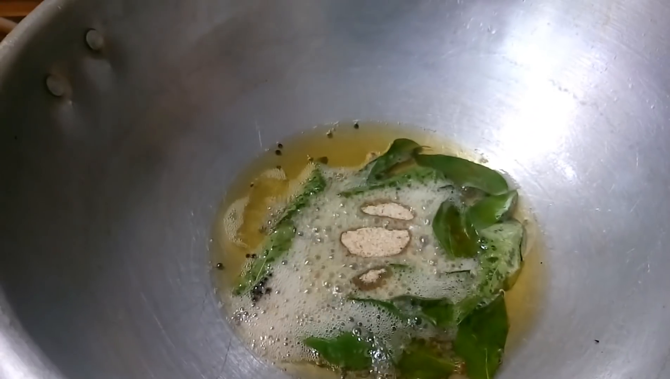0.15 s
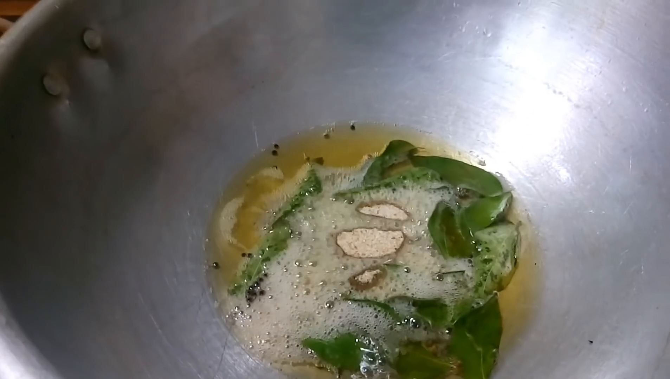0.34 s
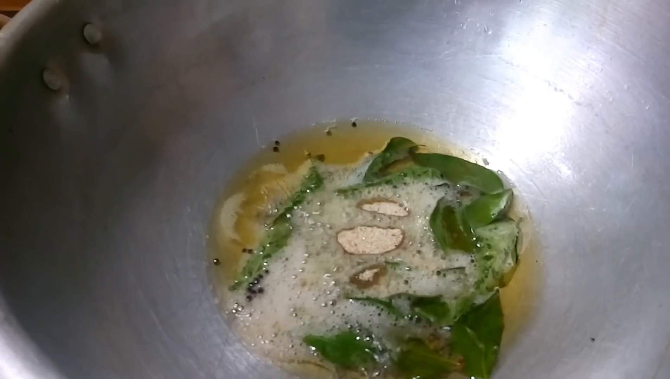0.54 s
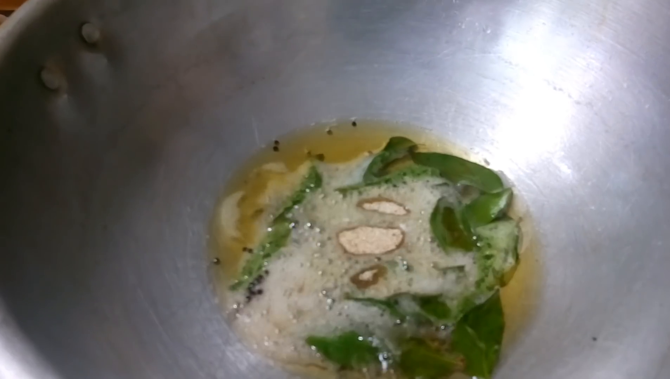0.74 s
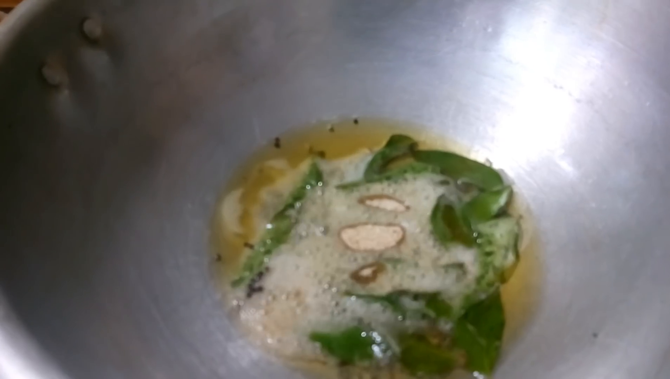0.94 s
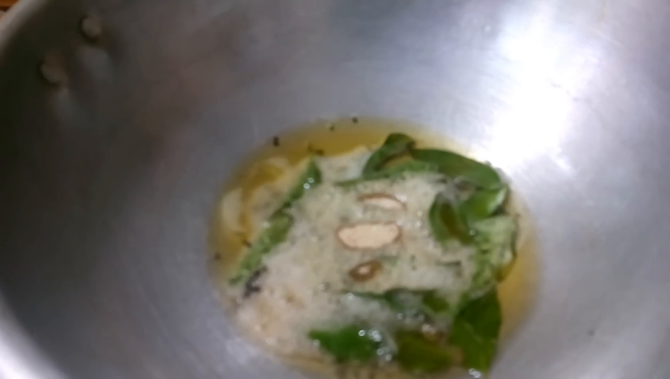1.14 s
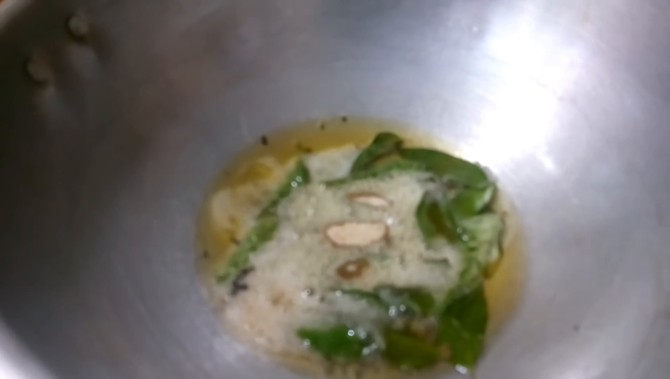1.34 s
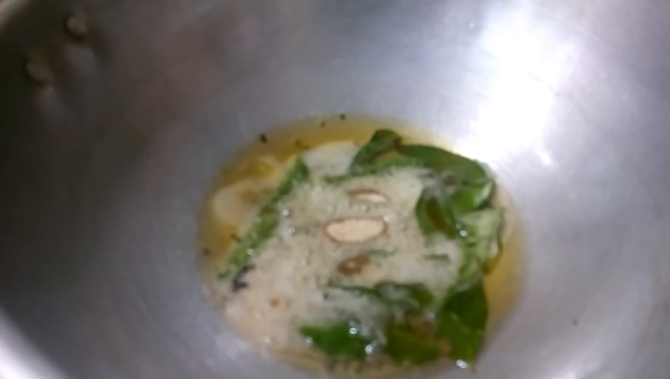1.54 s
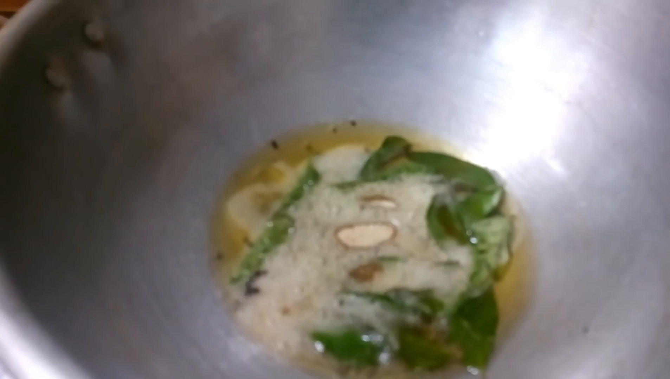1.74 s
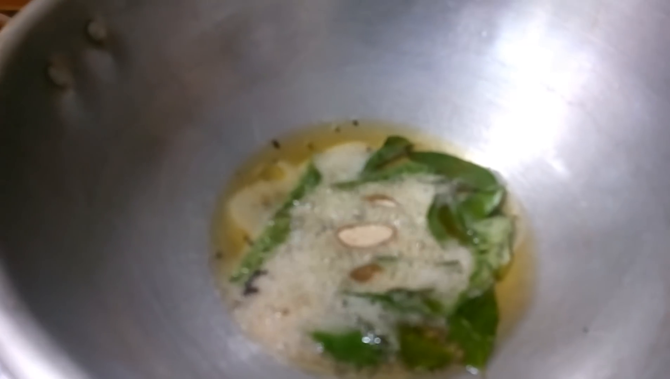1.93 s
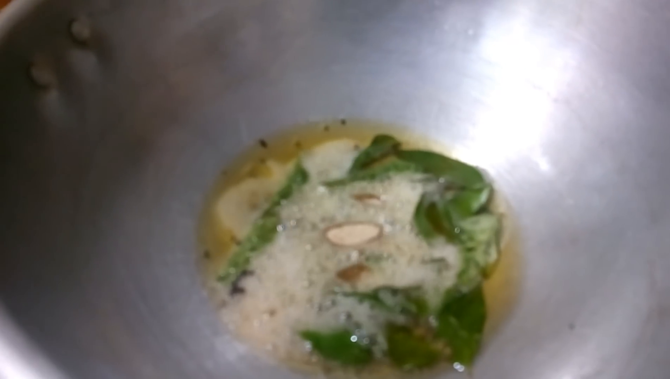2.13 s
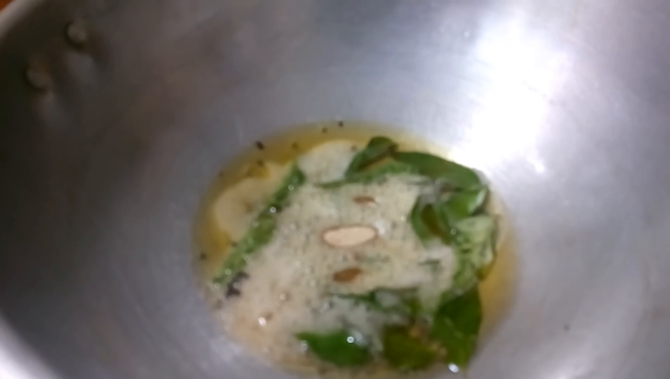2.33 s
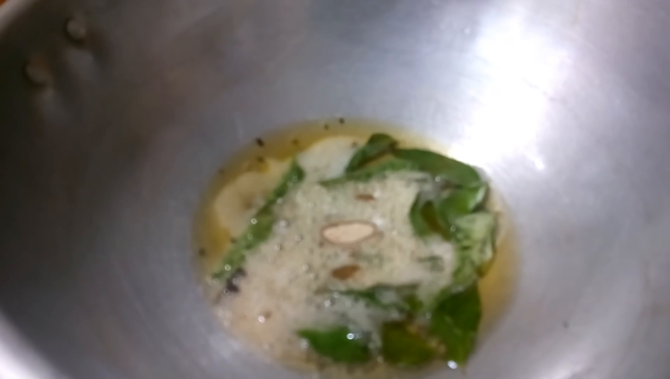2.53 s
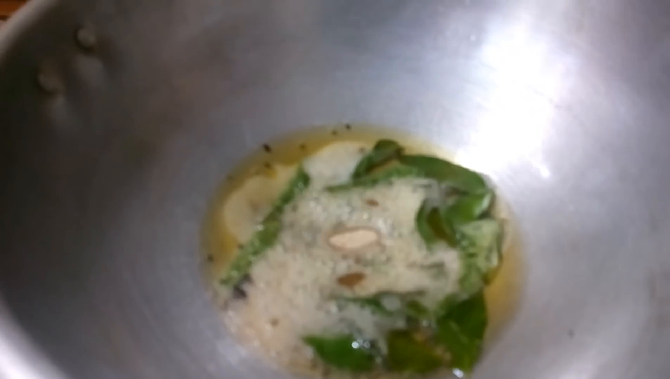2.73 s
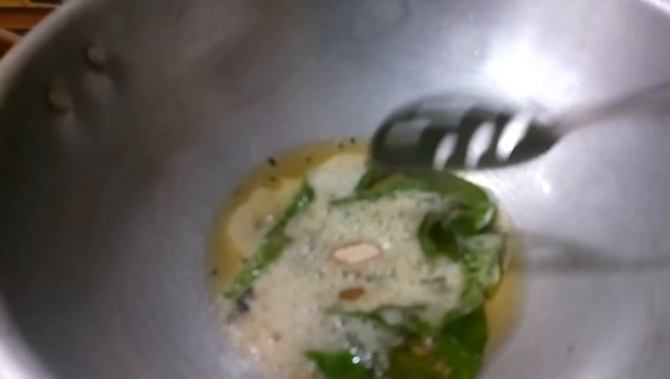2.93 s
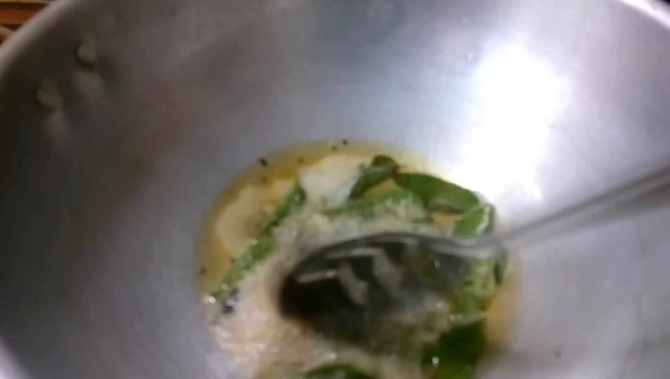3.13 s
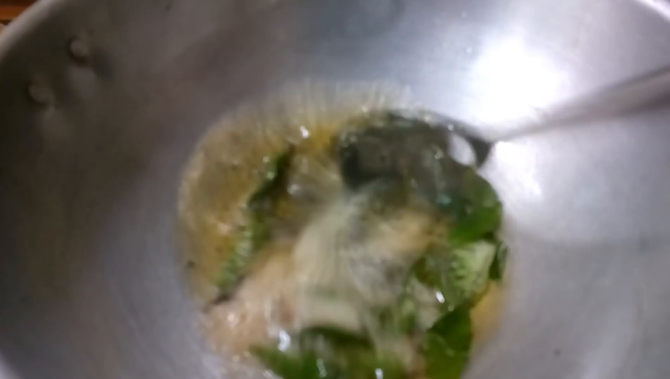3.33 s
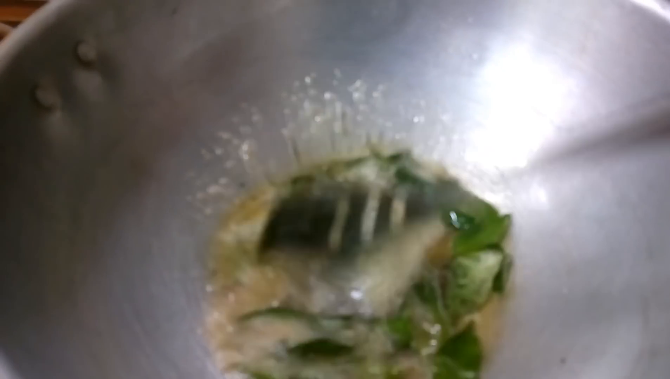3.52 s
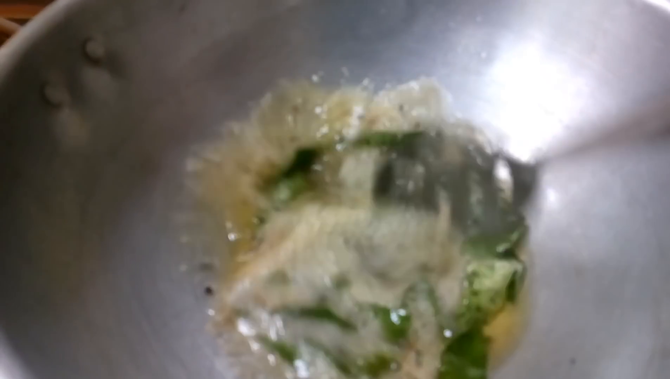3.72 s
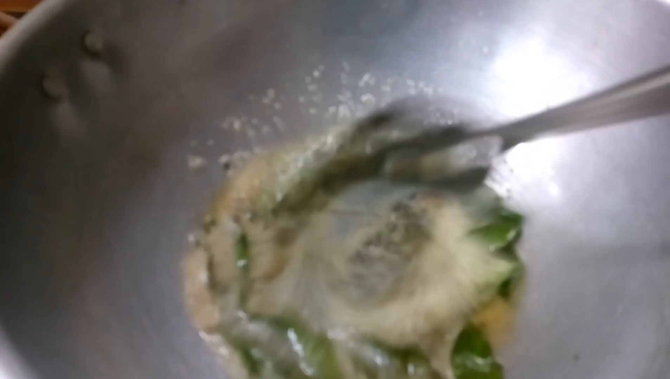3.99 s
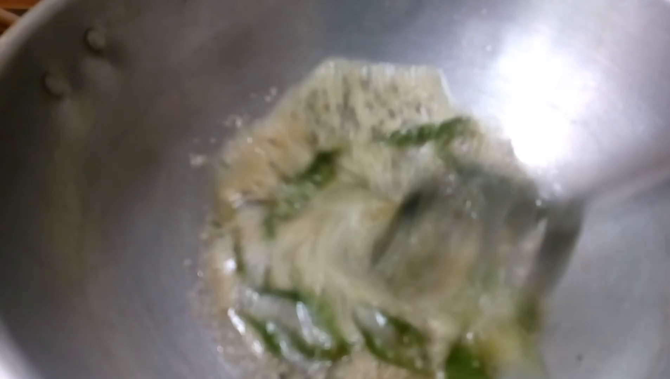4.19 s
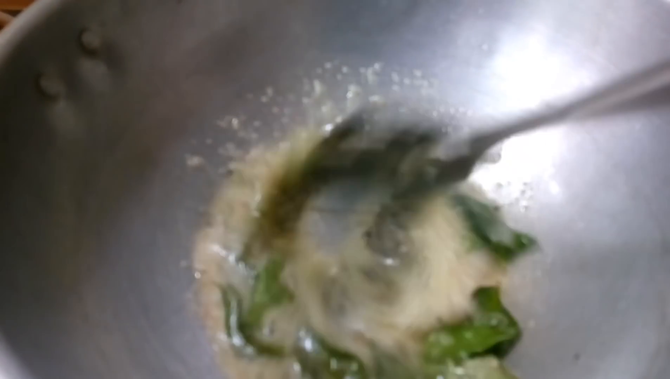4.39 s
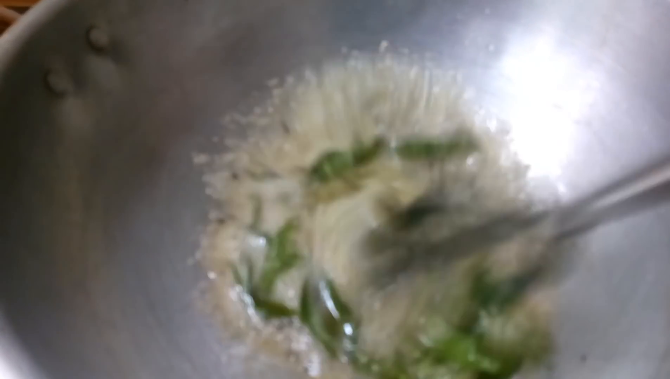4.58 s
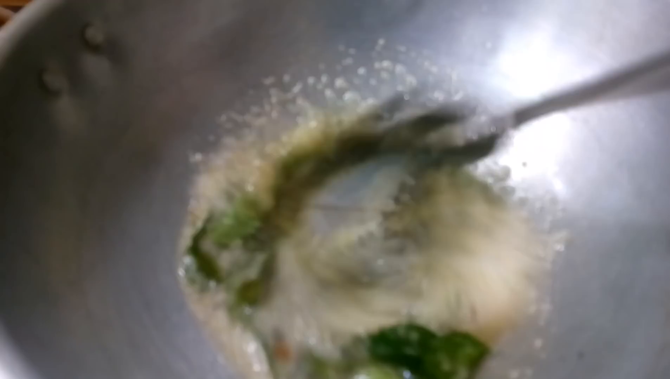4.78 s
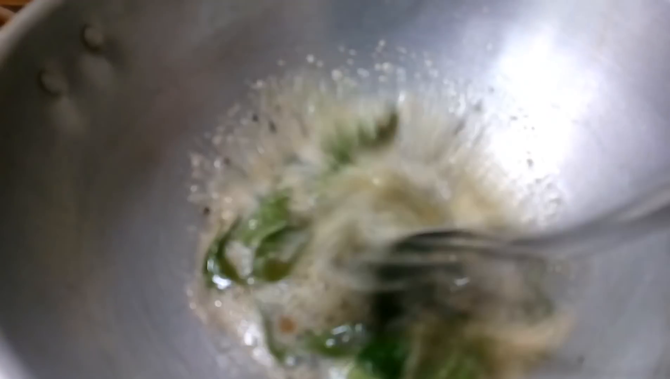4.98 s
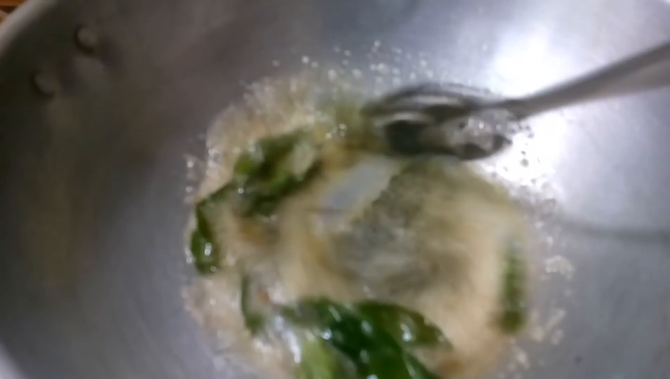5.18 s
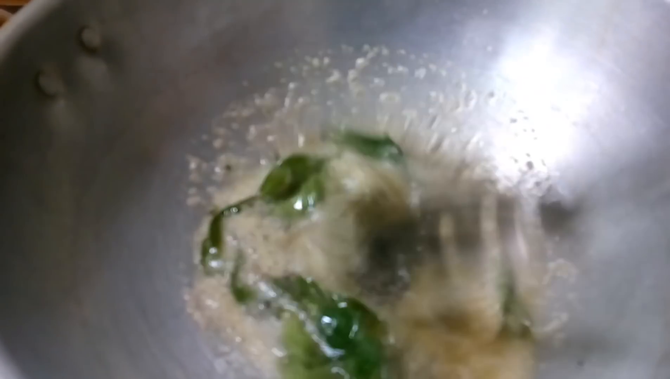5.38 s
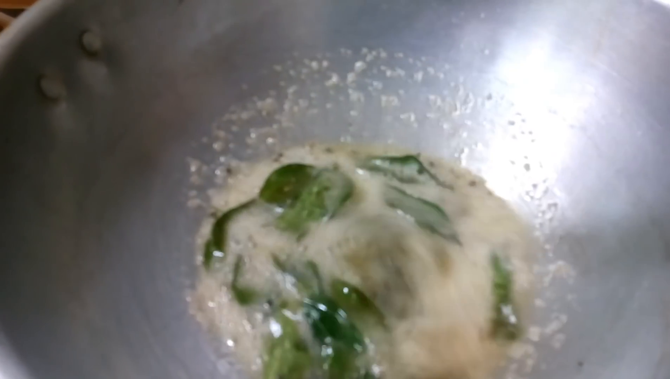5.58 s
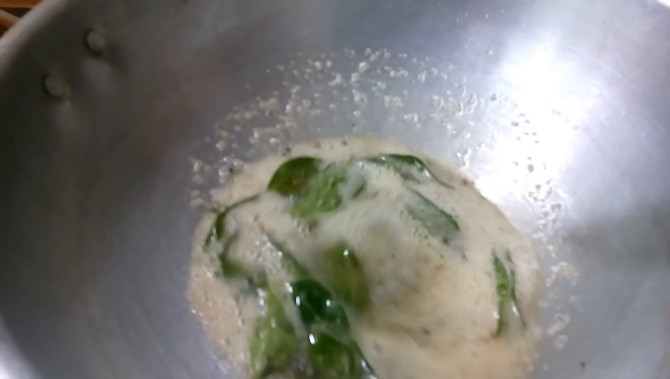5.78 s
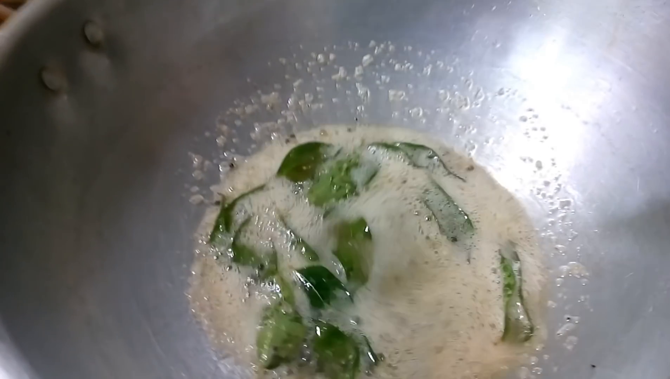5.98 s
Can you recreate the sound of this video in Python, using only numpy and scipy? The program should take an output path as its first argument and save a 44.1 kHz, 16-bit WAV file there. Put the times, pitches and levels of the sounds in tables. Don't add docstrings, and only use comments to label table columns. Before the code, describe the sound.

Heard close with a small microphone in a kitchen with a short echo, hot oil fizzes in a thin metal pan over low burner noise. The sizzle starts brighter, then quickly thins, with leaf blisters and seeds popping at about 0.1, 0.5 to 0.6, 0.9, 1.7, 2.0 and 2.3 seconds, and little bubbles ringing. A faint soft scuff passes before 0.6. A distant crow caws hoarsely near 0.7, 1.9 and, loudest, 2.6; a dull bump sounds across the room at 2.1. A sharp crack comes at 3.0. From 3.2 a metal spoon lands, knocking, scraping and rocking the pan. At 3.4 the oil flares loudly, then hisses and spits in rapid bursts, with strong cracks near 4.15. The rim squeaks briefly at 5.3. The spoon lifts around 5.5; a hard pop follows at 5.65, then quiet fizz and small cracks until 6 seconds.

```python
import sys
import numpy as np
from scipy import signal
from scipy.fft import rfft, irfft, next_fast_len
from scipy.io import wavfile
from scipy.ndimage import uniform_filter1d, map_coordinates

SR = 44100
rng = np.random.default_rng(int(sys.argv[2]) if len(sys.argv) > 2 else 0)


def voltage_ratio(decibels):
    exponent = np.asarray(decibels, float) / 20
    return 10 ** exponent


def transcribe(signal):
    frames = np.atleast_2d(signal).T
    limited = np.clip(frames, -1, 1)
    pcm = np.round(limited * 32767).astype(np.int16)
    wavfile.write(sys.argv[1], SR, pcm)


N = 265041

# f/Hz, level/dB
BURST_COLOUR = [(590, -31), (1000, -14.5), (1340, -12), (1880, -14.5), (2090, -10), (2520, -11.5),
                (2730, -8.5), (3790, -8.5), (6040, 3.5), (6480, -0.5), (8090, -22.5), (14300, -41.5),
                (16300, -27)]
# f/Hz, width/Hz, level/dB
BELLY_MODES = [(249, 40, -9.5), (286.4, 25, 0.5), (334.7, 11.6, 3), (377.3, 13.5, -2), (446, 54, -7),
               (552, 44, -15), (192, 55, -21.5)]
# f/Hz, width/Hz, level/dB
RIM_MODES = [(662, 41, -3), (797, 24, -0.5), (762, 42, -8), (913, 43, -6), (1104, 12, -8.5),
             (1282, 14, -6.5), (1400, 42, -17.5), (1567, 12.5, -5.5)]


def unit(x):
    return x / np.sqrt(np.mean(x ** 2) + 1e-20)


def along(points, hz):
    f, v = np.transpose(points)
    return np.interp(np.log(hz + 1), np.log(f + 1), v)


def envelope(times_s, levels):
    return np.interp(np.arange(N) / SR, times_s, levels)


def wobble(rate):
    knots = rng.standard_normal(int(N * rate / SR) + 4)
    return map_coordinates(knots, [np.arange(N) * rate / SR])


def filtered(x, response):
    m = 2 * next_fast_len(N // 2 + SR // 4)
    return irfft(rfft(x, m) * response(np.fft.rfftfreq(m, 1 / SR)), m)[:N]


def below(edge_hz, order=4):
    return lambda f: signal.freqs(*signal.butter(order, edge_hz, analog=True), f)[1]


def above(edge_hz, order=4):
    return lambda f: signal.freqs(*signal.butter(order, edge_hz, "high", analog=True), f)[1]


def causal(spectrum):
    def response(hz):
        cepstrum = irfft(np.log(voltage_ratio(along(spectrum, hz)) + 1e-6))
        half = len(cepstrum) // 2
        return np.exp(rfft(np.r_[cepstrum[0], 2 * cepstrum[1:half], np.zeros(half)]))
    return response


def modes(table):
    def response(f):
        total = 0
        for k, (centre, width, db) in enumerate(table):
            damping = 1j * f * width
            total = total + (-1) ** k * voltage_ratio(db) * damping / (centre * centre - f * f + damping)
        return total
    return response


def patchy(depth_db, bins, frames, size=256):
    z = signal.stft(rng.standard_normal(N), nperseg=size)[2]
    field = uniform_filter1d(rng.standard_normal(z.shape), bins, 0)
    field = uniform_filter1d(field, frames, 1)
    return unit(signal.istft(z * voltage_ratio(depth_db * unit(field)), nperseg=size)[1][:N])


def ticks(rate, spread_db):
    chance, sign, size = rng.random((3, N))
    return unit((chance < rate / SR) * np.sign(sign - .5) * voltage_ratio(-spread_db * np.log(1 - size)))


def surges(s, db, fall_s, rise):
    coarse = np.arange(0, N + 64, 64)
    lag = coarse[:, None] / SR - s
    drop_db = 10 * np.where(lag < 0, -lag / rise, lag) / np.abs(fall_s)
    power = voltage_ratio(2 * (db - drop_db)).sum(axis=1)
    return np.interp(np.arange(N), coarse, np.sqrt(power))


def swell(s, length):
    return envelope([s, s + .006, s + .8 * length, s + 1.2 * length], [0, 1, .7, 0])


def bubbles(rate, centre_hz, spread, cycles, size_db):
    u = rng.random((int(rate * N / SR), 3))
    hz = np.clip(centre_hz * np.exp(spread * rng.standard_normal(len(u))), 500, 15000)[:, None]
    t = np.arange(320) / SR
    size = np.minimum(-np.log(1 - u[:, 1:2]), 4.2)
    tone = voltage_ratio(size_db * size) * np.exp(-t * hz / cycles) * np.sin(2 * np.pi * hz * t)
    at = (u[:, :1] * N).astype(int) + np.arange(320)
    return unit(np.bincount(at.ravel(), tone.ravel(), N + 320)[:N])


def froth(centre_hz, cycles, band, crackle_db, patchy_db):
    hiss = patchy(patchy_db, 4, 11) * voltage_ratio(1.2 * wobble(30))
    clumps = voltage_ratio(1.5 * wobble(22) + 2 * wobble(80))
    crackle = unit(clumps * bubbles(700, centre_hz, spread=.4, cycles=cycles, size_db=2.6))
    return unit(filtered(hiss + voltage_ratio(crackle_db) * crackle, lambda f: causal(BURST_COLOUR)(f) * band(f)))


def fizz():
    # t/s, fizz level/dB
    steam_flow = [(0, -46.5), (.24, -52), (.96, -54), (1.56, -51.5), (2.15, -50), (2.96, -50.5),
                  (3.3, -48.5), (3.45, -40.5), (5.45, -40.5), (5.62, -53.5), (5.87, -50.5), (6.01, -50)]
    # t/s, fizz level/dB, time to fall 10 dB/s, splash over fizz/dB, spray over fizz/dB
    flare_events = [(0, -40.5, -0.04, 1, -11.5), (.54, -56, 0.37, 0.5, -18), (.95, -51.5, 1.2, -15, -8),
                    (3.11, -41.5, -0.21, -43, -22), (3.23, -41, -0.04, -4.5, -8.5),
                    (3.431, -25.5, -0.0263, -13.5, -17), (3.476, -26, 0.02, -11, -12),
                    (3.557, -32, 0.02, -3, -12), (3.76, -34, -0.06, -28, -29),
                    (3.901, -34.5, 0.03, -5, -13), (4.035, -33.5, 0.0651, -5, -18),
                    (4.16, -30, 0.01, -1.5, -21), (4.228, -28.5, 0.0023, -3, -32),
                    (4.335, -35, 0.08, -12, -13), (4.536, -34.5, 0.097, -2, -12),
                    (4.74, -36, 0.16, -3.5, -15), (4.92, -32.5, 0.01, -2, -10),
                    (5.072, -32.5, 0.04, -4.5, -5), (5.201, -30, 0.03, -4.5, -24),
                    (5.26, -31.5, -0.0231, -8, -28), (5.329, -34.5, 0.0353, -3.5, -27),
                    (5.42, -30, 0, -6.5, -31), (5.53, -41.5, -0.22, -8, -12), (5.7, -51, 0.1, -10, -2)]
    flow_db = envelope(*np.transpose(steam_flow))
    s, db, fall_s, splash_db, spray_db = np.transpose(flare_events)
    flutter = voltage_ratio(2.5 * wobble(28))

    def level(calm_db, flare_db):
        return np.hypot(voltage_ratio(calm_db), flutter * surges(s, flare_db, fall_s, rise=0.96))

    def middle_band(f):
        return above(3600)(f) * below(7400, order=8)(f)

    def tiny_band(f):
        return above(7800)(f) * (.12 + below(11700, order=12)(f))

    def calm_band(f):
        return 0.23 + 0.69 * np.abs(above(1850)(f))

    large = froth(2400, 4, below(3600), crackle_db=-10.5, patchy_db=3)
    middle = froth(5800, 2.0, middle_band, crackle_db=-6.5, patchy_db=1.5)
    tiny = froth(13900, 1.5, tiny_band, crackle_db=-4.5, patchy_db=2.5)
    over_db = flow_db + 50
    calm_splash = voltage_ratio(-64.5 + 1.9 * over_db) * filtered(large, calm_band)
    flare_splash = level(-120, db + splash_db - 2.0) * large
    spray = level(-68.5 + 2.1 * over_db, db + spray_db) * tiny
    return calm_splash + flare_splash + level(flow_db, db) * middle + spray


def kitchen():
    # f/Hz, level/dB
    hum_colour = [(20, -51), (48, -13), (75, -8), (140, 0), (270, -7), (500, -10), (800, -10), (1550, -27),
                  (2300, -10.5), (4000, -38)]
    hum = filtered(patchy(2.4, 7, 14, size=1024), lambda hz: voltage_ratio(along(hum_colour, hz)))
    return voltage_ratio(-66.5) * unit(hum)


def air():
    hiss = unit(filtered(rng.standard_normal(N), above(8000)))
    specks = unit(filtered(ticks(28, spread_db=2), above(9500)))
    return voltage_ratio(-91) * hiss + voltage_ratio(-89) * specks


def plips():
    # t/s, peak level/dB, f/Hz
    quiet_plips = [(0.0025, -30.5, 5350), (0.005, -31, 5070), (0.0863, -20, 6010), (0.2888, -29, 6270),
                   (0.5288, -21, 6300), (0.5587, -28, 3960), (0.5587, -18, 5500), (0.5872, -28, 5500),
                   (0.6201, -27.5, 6600), (0.9054, -25, 5950), (0.9228, -23, 1360), (0.9279, -12.5, 6170),
                   (0.9404, -26, 2100), (0.9583, -32, 5680), (1.7186, -22.5, 3440), (1.7231, -18, 5900),
                   (1.9915, -22.5, 6040), (2.1726, -28.5, 2640), (2.7867, -25.5, 5650),
                   (2.8296, -34.5, 5680), (3.0141, -7.5, 5260), (3.0181, -9.5, 5900), (3.0256, -20, 5600),
                   (3.0306, -16, 6450), (3.096, -25.5, 1490), (3.0975, -25, 2170), (3.103, -28, 4530),
                   (3.2025, -34, 2800), (3.2435, -40, 1500), (5.532, -28, 4240), (5.5545, -31.5, 3300),
                   (5.5675, -35, 2400), (5.5965, -29, 2780), (5.616, -36, 4300), (5.934, -38, 3600),
                   (3.1005, -25, 5900), (3.2232, -28, 6350), (3.2451, -33, 6050), (3.2696, -27, 5680),
                   (3.2875, -21, 3340)]
    # t/s, peak level/dB, f/Hz
    stirred_plips = [(3.4245, -23, 3340), (3.4269, -13, 6100), (3.4302, -21, 6400), (3.4417, -15.5, 3700),
                     (3.4617, -12, 6250), (3.4827, -15, 6200), (3.549, -24, 5680), (3.5703, -22, 5070),
                     (3.664, -21, 6010), (3.729, -24, 6260), (3.732, -15, 5600), (3.7597, -19, 4870),
                     (3.7634, -30, 5600), (3.8348, -23, 6010), (3.8593, -20, 3340), (3.8591, -14.5, 5540),
                     (3.865, -28, 5350), (3.948, -19, 5680), (3.952, -17.5, 6010), (3.98, -23, 5680),
                     (3.9934, -23, 6010), (4.0268, -21, 5680), (4.039, -20, 5630), (4.0536, -26, 5680),
                     (4.149, -11, 6100), (4.212, -18, 4600), (4.2267, -19, 6060), (4.2434, -21, 5680),
                     (4.5117, -17, 5400), (4.531, -17, 5730), (4.5427, -22, 3010), (4.5693, -19, 6010),
                     (4.7746, -26, 5750), (4.78, -25, 6350), (4.836, -26, 6010), (4.8925, -17.5, 5680),
                     (4.9039, -24, 4130), (4.931, -14, 6010), (4.933, -13, 5680), (4.9387, -19, 5560),
                     (4.9556, -15, 6010), (5.039, -23, 6010), (5.042, -19, 6060), (5.057, -21, 4340),
                     (5.093, -13, 4340), (5.1045, -28, 5680), (5.1973, -13, 6010), (5.2027, -27, 5680),
                     (5.2501, -24, 6010), (5.279, -17, 6010), (5.3231, -17.5, 6010), (5.3279, -18.5, 6010),
                     (5.3313, -20, 5640), (5.34, -20, 6010), (5.3434, -23, 6010), (5.4415, -18, 5680),
                     (5.4446, -21, 5350), (5.518, -23, 5630)]
    ring_s = 0.0015
    x, t = np.zeros(N + SR), np.arange(400) / SR
    age = t / ring_s
    shape = (2 * np.e * age * np.exp(-2 * age)) ** 2
    for s, db, hz in [*quiet_plips, *stirred_plips]:
        start = round((s - ring_s / 2) * SR)
        x[start:][:len(t)] += voltage_ratio(db - 2) * shape * np.sin(2 * np.pi * hz * t)
    return x[:N]


def bursts():
    # t/s, peak level/dB, cavity f/Hz, cavity level/dB
    quiet_blisters = [(.5097, -41, 3400, -11), (.5208, -17, 3380, -15.5), (.5375, -29.5, 2540, -8.5),
                      (.5573, -14, 1820, -20), (.5816, -24, 2050, -10.5), (.7981, -35.5, 2600, -5.5),
                      (.832, -38.5, 2270, -6.5), (.9218, -14, 3240, -9), (1.1108, -33.5, 2740, -2.5),
                      (1.2885, -48, 2330, -2), (1.3014, -34, 2130, -3.5), (1.4641, -40, 2560, -7),
                      (1.7169, -14.5, 3160, -13), (1.829, -39, 2400, -5), (2.1672, -31.5, 2600, -5.5),
                      (2.2814, -17, 3240, -15), (2.5461, -26.5, 3000, -15.5), (2.791, -25.5, 2500, -6.5),
                      (2.826, -28.5, 2540, -10), (3.095, -17, 4170, -10), (3.2593, -20.5, 2680, -8.5),
                      (3.2857, -16.5, 3100, -12.5)]
    # t/s, peak level/dB, cavity f/Hz, cavity level/dB
    stirred_blisters = [(3.424, -16, 1230, -11), (3.485, -14, 3230, -14), (3.711, -26, 3300, -10),
                        (3.7265, -18, 3940, -17), (3.7563, -15, 1310, -5.5), (3.8568, -16, 3570, -14.5),
                        (4.185, -20, 2710, -9), (4.363, -10.5, 1560, -21), (4.528, -20, 3170, -11.5),
                        (5.056, -15, 3730, -20.5), (5.0915, -22, 4330, -14), (5.0995, -27, 2630, -1.5),
                        (5.5955, -37, 2470, -5.5), (5.7386, -21.5, 2180, -14)]
    # t/s, peak level/dB, snap level/dB
    quiet_seeds = [(.085, -12, -18.5), (0.2868, -30.5, -52), (0.477, -30, -45), (0.6183, -22, -54),
                   (0.896, -26, -21), (1.1807, -34, -27.5), (1.3525, -33, -33), (1.541, -34, -46),
                   (1.6075, -25, -35), (1.8788, -28, -30), (1.9862, -18.5, -13.5), (2.063, -34, -45),
                   (2.373, -18.5, -39), (2.4453, -34, -6), (2.746, -28, -47), (2.8684, -29.5, -39.5),
                   (2.887, -33.5, -9), (2.9306, -23, -23), (3.0079, -4, -32), (3.202, -26, -25.5),
                   (3.221, -20, -40), (5.8238, -31, -6)]
    # t/s, peak level/dB, snap level/dB
    stirred_seeds = [(3.441, 2.5, -19), (3.599, -3, -18.5), (3.4245, -10, -32), (3.7297, -23, -47),
                     (3.9444, -9, -13.5), (4.148, 6.5, -16.5), (4.2104, -9, -32), (4.4244, -11, -22),
                     (4.45, -10, -22), (4.8505, -13, -37), (4.9468, -13.5, -30), (5.27, -16, -39),
                     (5.196, -7.5, -30), (5.2435, -1.5, -41), (5.5172, -9.5, -13), (5.5299, -25, -23),
                     (5.5539, -18, -45), (5.6141, -46, -19), (5.652, 3.5, -20.5), (5.713, -23, -15),
                     (5.877, -19.5, -18), (5.934, -28.5, -47), (5.946, -21, -49.5)]
    rows = []
    for blisters, seeds, t60 in ((quiet_blisters, quiet_seeds, 0.046),
                                 (stirred_blisters, stirred_seeds, 0.022)):
        both = [(s, db, hz, cavity_db, -31) for s, db, hz, cavity_db in blisters]
        for s, db, snap_db in seeds:
            cavity_db = -23.5 - 0.22 * (db + 25.5)
            both.append((s, db, 3000, cavity_db, snap_db))
        for row in both:
            rows.append((*row, t60 * voltage_ratio(-0.21 * (row[1] + 35))))
    return rows


def snap_reach(s, strength_db):
    mist_s, mist_hz = (.085, .8963, 2.887, 2.932, 3.008, 5.877), 14600
    if np.abs(s - np.array(mist_s)).min() < .006:
        return mist_hz
    reach_hz = np.clip(10400 + 450 * (strength_db + 48), 9000, mist_hz)
    stirring = 3.4 < s < 5.8
    return reach_hz if stirring else min(reach_hz, 11700)


def pops():
    # f/Hz, level/dB, t60/s (time to die by 60 dB)
    wall_rings = [(750, 10, 1), (1050, -10, 0.84), (1498, -11.5, 0.042), (2026, 5.5, 0.15),
                  (1858, -3.5, 0.073), (2170, 3, 0.21), (2680, 3, 0.25), (3126, -1, 0.083),
                  (3835, 2, 0.018), (4340, 5, 0.062)]
    t = np.arange(SR // 6) / SR
    body, deep, snap = np.zeros((3, N + SR))
    for s, db, hz, cavity_db, snap_db, t60 in bursts():
        noise, chance = rng.standard_normal((2, len(t)))
        crack = 0.45 * voltage_ratio(-60 * t / 0.0023) * noise
        crack[0] = 3.34
        droplets = (chance > 2.2) * noise * voltage_ratio(8.5 - 60 * t / t60)
        steam = noise * voltage_ratio(-13.5 - 60 * t / (2.0 * t60))
        burst = crack + droplets + steam
        cavity = signal.lfilter(*signal.iirpeak(np.clip(hz, 600, 6000), 1.9, SR), burst)
        start = round((s + .0006) * SR)
        at = slice(start, start + len(t))
        body[at] += voltage_ratio(db) * burst
        deep[at] += voltage_ratio(db + cavity_db + 25.5) * cavity
        bright = 0.34 * crack + 0.04 * droplets + 0.84 * steam * voltage_ratio(-60 * t / 0.28)
        bright = signal.lfilter(*signal.butter(10, snap_reach(s, db + snap_db), fs=SR), bright)
        snap[at] += voltage_ratio(db + snap_db + 31.0) * bright
    deep = deep[:N]
    sizzle = filtered(body[:N], lambda f: above(3800)(f) * below(7600)(f))
    drive = deep + sizzle + filtered(snap[:N], above(7480))
    wall = [(hz, np.log(1000) / np.pi / t60, db) for hz, db, t60 in wall_rings]

    def pan_ring(f):
        rim = voltage_ratio(1.0) * modes(RIM_MODES)(f) * above(760)(f)
        belly = voltage_ratio(-5.5) * modes(BELLY_MODES)(f)
        return (voltage_ratio(-9.0) * modes(wall)(f) + rim + belly) * below(5500)(f)

    return voltage_ratio(0.5) * filtered(drive, causal(BURST_COLOUR)) + filtered(deep, pan_ring)


def scuff():
    colour = [(710, 310, -1.8), (2100, 130, -0.089), (2540, 190, -0.99)]  # f/Hz, width/Hz, level/dB
    rub = filtered(patchy(2.3, 3, 12), lambda f: modes(colour)(f) ** 2)
    return voltage_ratio(-61.5) * unit(rub) * envelope((.1, .2, .45, .62), [0, 1, 1, 0])


def crow():
    # t/s, length/s, level/dB
    caws = [
        (0.705, 0.16, -66.5),
        (1.85, 0.39, -64.5),
        (2.636, 0.29, -60.5),
    ]
    # f/Hz, width/Hz, level/dB
    throat = [
        (1476, 38, 0),
        (1874, 140, -1),
    ]
    voice = unit(filtered(rng.standard_normal(N), lambda f: modes(throat)(f) ** 2))
    loudness = np.zeros(N)
    for s, length, db in caws:
        times_s = [s - 0.38 * length, s + 0.32 * length, s + 0.63 * length, s + 0.92 * length]
        loudness += voltage_ratio(db) * envelope(times_s, [0, 0.85, 0.93, 0])
    return voice * loudness


def far_knock():
    # t/s, level/dB, f/Hz
    bumps = [
        (2.092, -45.5, 1060),
        (2.12, -54, 800),
    ]
    x, t = np.zeros(N), np.arange(SR // 10) / SR
    for s, db, hz in bumps:
        x[round(s * SR):][:len(t)] += voltage_ratio(db - 60 * t / 0.021) * np.sin(2 * np.pi * hz * t * (1 - 3 * t))
    return x


def scrapes():
    # t/s, scrape level/dB, time to fall 10 dB/s, rim over scrape/dB
    stroke_events = [(3.24, -66, -1, -3), (3.422, -32, 0.04, -13), (3.5, -46.5, -0.13, 6.5),
                     (3.587, -46, -0.11, -9), (3.64, -64.5, 0.5, 0), (3.761, -35, 0, -15),
                     (3.881, -47.5, 0.06, 5.5), (4.058, -43, 0.28, -1), (4.2, -36, 0.04, -9.5),
                     (4.451, -41.5, 0.04, 4.5), (4.69, -43, 0.41, -0.5), (5.06, -36, 0, -9),
                     (5.2, -42, 0.11, -0.5), (5.312, -49.5, -0.33, 3), (5.42, -47.5, -0.16, 8)]
    s, db, fall_s, rim_db = np.transpose(stroke_events)
    slips = voltage_ratio(4.13 * wobble(30)) * (ticks(200, spread_db=0.5) + 1.02 * rng.standard_normal(N))
    belly = surges(s, db, fall_s, rise=0.49) * unit(filtered(slips, modes(BELLY_MODES)))
    rim = surges(s, db + rim_db, fall_s, rise=0.49) * unit(filtered(slips, modes(RIM_MODES)))
    return belly + rim


def knocks():
    # t/s, peak level/dB, hardness/dB
    blows = [(3.365, -28, -24.5), (3.218, -18, -31), (3.258, -36, -24), (3.384, -21.5, -25),
             (3.4212, -10.5, -3.5), (3.688, -14.5, -23), (3.756, -7.5, -4.5), (3.873, -37, 5),
             (3.992, -37, 7.5), (4.076, -44, -10), (4.137, -17, 0.5), (4.182, -13.5, 1), (4.382, -18, -7.5),
             (4.435, -20.5, -16.5), (4.569, -26, -32), (4.6, -36, 4), (4.644, -54, 10), (4.763, -21, -3.5),
             (4.952, -32, 10.5), (5.03, -25.5, 4), (5.122, -27, -5.5), (5.158, -21, -7), (5.327, -30, 11),
             (5.594, -54, 16.5)]
    soft, hard, t = np.zeros(N), np.zeros(N), np.arange(120) / SR
    push = np.sin(np.pi * t * SR / len(t)) ** 2
    click = voltage_ratio(-60 * t / 0.00048)
    for s, db, hardness_db in blows:
        soft[round((s + .0005) * SR):][:len(t)] += voltage_ratio(db + 1.0) * push
        sign = np.sign(rng.standard_normal())
        hard[round((s + .0025) * SR):][:len(t)] += voltage_ratio(db + hardness_db + 23.0) * click * sign

    def thud(f):
        return modes(RIM_MODES)(f) + voltage_ratio(-16.5) * above(500, order=2)(f) * below(1700, order=2)(f)

    return filtered(soft, modes(BELLY_MODES)) + filtered(hard, thud)


def rocking():
    # t/s, length/s, level/dB
    tips = [
        (3.23, 0.099, -50),
        (3.406, 0.05, -47.5),
        (3.723, 0.14, -46.5),
        (4.2, 0.18, -52.5),
        (4.62, 0.046, -55),
        (5.315, 0.043, -56),
    ]
    stand_hz, soft_edge_s = 96.5, 0.023
    jolt = [(36, 47, -7), (146, 48, -1)]
    ring = np.sqrt(2) * np.sin(2 * np.pi * stand_hz * np.arange(N) / SR + .6 * wobble(15))
    shudder = voltage_ratio(-3) * unit(filtered(rng.standard_normal(N), modes(jolt)))
    sway = sum(voltage_ratio(db) * swell(s, length) for s, length, db in tips)
    return uniform_filter1d(sway, int(soft_edge_s * SR)) * (ring + shudder)


def spoon():
    touching = envelope((3.17, 3.21, 5.47, 5.53), [0, 1, 1, 0])
    contact = touching * scrapes() + knocks()
    return touching * rocking() + filtered(contact, lambda f: above(150, order=2)(f) * below(3500)(f))


def vents():
    # middle t/s, length/s, level/dB, f/Hz
    jets = [(3.437, 0.023, -37, 4580), (3.452, 0.035, -37, 2880), (3.477, 0.035, -28, 6430),
            (3.488, 0.029, -43, 3620), (3.489, 0.032, -41, 4650), (3.549, 0.033, -31.5, 3020),
            (3.564, 0.068, -30.5, 5200), (3.575, 0.03, -34, 4750), (3.73, 0.023, -28, 4600),
            (3.772, 0.025, -37, 5680), (3.818, 0.06, -30.5, 6020), (3.862, 0.018, -27, 5230),
            (3.957, 0.049, -32.5, 4400), (3.988, 0.024, -34, 6660), (4.038, 0.045, -35, 5400),
            (4.153, 0.02, -22.5, 6100), (4.152, 0.019, -35, 3940), (4.155, 0.023, -40, 6850),
            (4.195, 0.035, -39, 2930), (4.216, 0.022, -32, 4600), (4.221, 0.027, -29, 5700),
            (4.497, 0.083, -36.5, 4000), (4.517, 0.052, -30, 5600), (4.538, 0.039, -50, 2930),
            (4.54, 0.081, -37, 6260), (4.55, 0.05, -29.5, 5930), (4.741, 0.038, -36.5, 2030),
            (4.901, 0.022, -30.5, 4160), (4.908, 0.04, -38.5, 1540), (4.922, 0.054, -37.5, 3180),
            (4.936, 0.025, -24, 5700), (4.962, 0.022, -40, 1180), (5.076, 0.065, -43, 4310),
            (5.079, 0.067, -33, 5270), (5.094, 0.023, -41, 4310), (5.098, 0.034, -36, 3580),
            (5.202, 0.027, -32, 5740), (5.226, 0.058, -40, 3960), (5.247, 0.021, -41, 6160),
            (5.248, 0.03, -35, 4480), (5.323, 0.029, -34.5, 2600), (5.328, 0.028, -29, 6200),
            (5.361, 0.082, -41, 1120), (5.401, 0.039, -33.5, 3230), (5.431, 0.048, -32, 5350)]
    half_width_hz = 750 / 2
    x, noise = np.zeros(N + SR), rng.standard_normal((len(jets), SR // 4))
    for (s, length, db, hz), hiss in zip(jets, noise):
        n = min(int(abs(length) * 1.6 * SR), len(hiss))
        band = signal.butter(2, [hz - half_width_hz, hz + half_width_hz], "band", fs=SR)
        jet = unit(signal.lfilter(*band, hiss)[:n])
        x[round(s * SR) - n // 2:][:n] += voltage_ratio(db - 3.5) * np.hanning(n) * jet
    return x[:N]


def spits():
    # t/s, peak level/dB
    droplet_clicks = [(3.4243, -12), (3.7115, -28), (3.7266, -9), (3.8575, -6), (5.1968, -10),
                      (4.0253, -18), (4.149, -13), (4.2107, -5), (4.2956, -15), (4.3251, -11.5),
                      (4.509, -7), (4.529, -12), (4.589, -27), (4.6409, -32), (4.7735, -19), (4.889, -6),
                      (5.0235, -9), (5.094, -17), (5.3218, -11), (5.517, -16), (5.6517, -12)]
    x = np.zeros(N)
    for s, db in droplet_clicks:
        x[round(s * SR)] = voltage_ratio(db + 4.5)
    return filtered(x, lambda f: causal(BURST_COLOUR)(f) * above(2500, order=2)(f))


def singing():
    # t/s, length/s, level/dB, f/Hz
    drags = [
        (5.345, 0.059, -29, 800),
        (5.322, 0.018, -29, 770),
        (5.32, 0.032, -37, 1300),
        (5.44, 0.031, -55, 800),
        (5.414, 0.012, -42, 790),
        (4.648, 0.028, -42, 800),
        (5.594, 0.013, -42, 780),
    ]
    t = np.arange(N) / SR
    x = np.zeros(N)
    for s, length, db, hz in drags:
        tone = np.sin(2 * np.pi * hz * t + 1.45 * wobble(90))
        x += voltage_ratio(db + 2.9 * wobble(55)) * swell(s, length) * tone
    return x


def room(x, pieces=.3):
    # f/Hz, t60/s
    echo_t60 = [(300, 0.48), (2000, 0.2), (6000, 0.2), (12000, 0.096)]
    out, step = np.zeros(N + SR), int(pieces * SR)
    for a in range(0, N, step):
        hz, t, z = signal.stft(rng.standard_normal(SR // 2), SR, nperseg=256)
        fade = voltage_ratio(-60 * t / along(echo_t60, hz)[:, None])
        tail = signal.istft(z * fade, SR, nperseg=256)[1]
        wet = signal.fftconvolve(x[a:a + step], tail / np.linalg.norm(tail))
        out[a + 200:][:len(wet)] += wet
    return out[:N]


def scene():
    pan = pops() + spoon() + singing() + plips() + spits()
    far = far_knock()
    echo = room(voltage_ratio(-10.5) * pan + voltage_ratio(11.0) * far)
    background = crow() + scuff() + kitchen() + air()
    return (pan + fizz() + vents() + .5 * far + echo + background)[None]


def roll_off(x):
    return signal.sosfilt(signal.butter(12, 15450, fs=SR, output="sos"), x)


def record(dry):
    return roll_off(dry)


dry = scene()
out = record(dry)
transcribe(out)
```